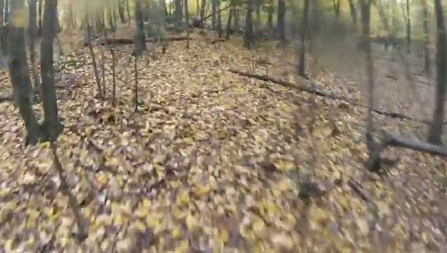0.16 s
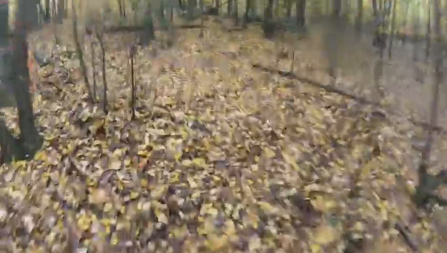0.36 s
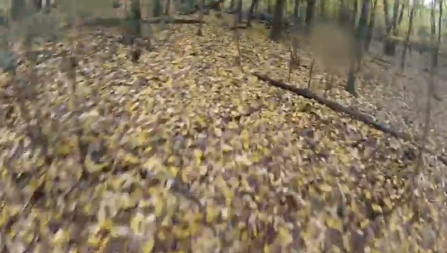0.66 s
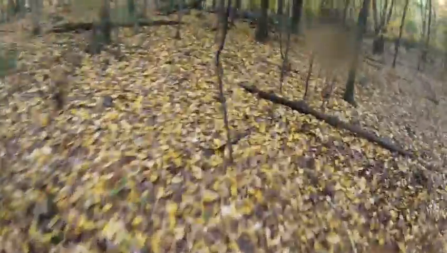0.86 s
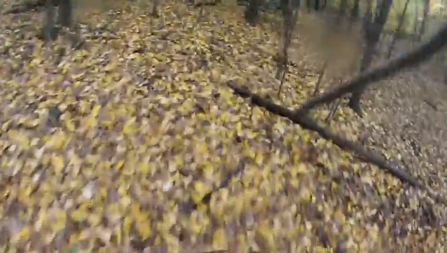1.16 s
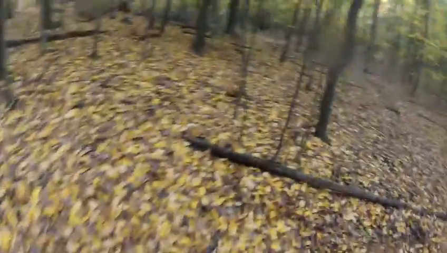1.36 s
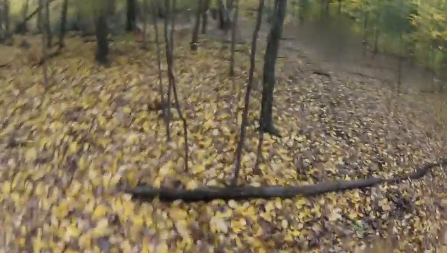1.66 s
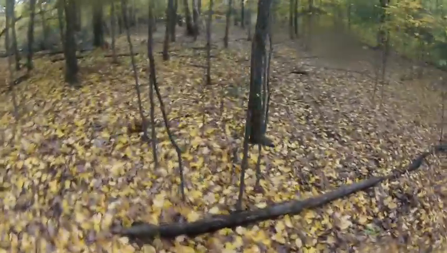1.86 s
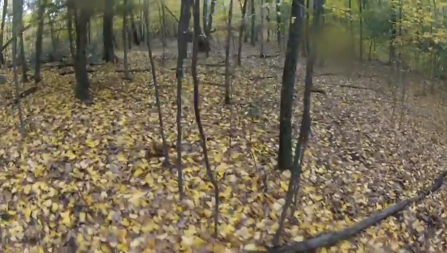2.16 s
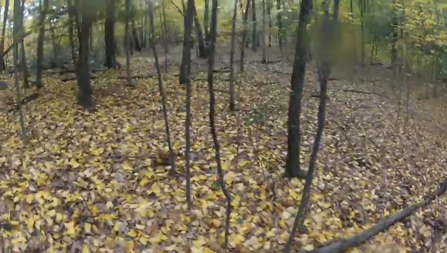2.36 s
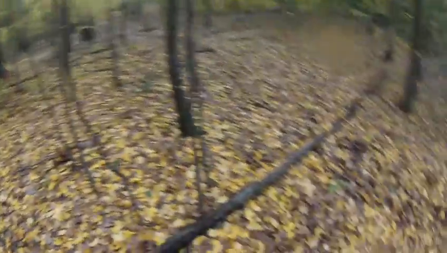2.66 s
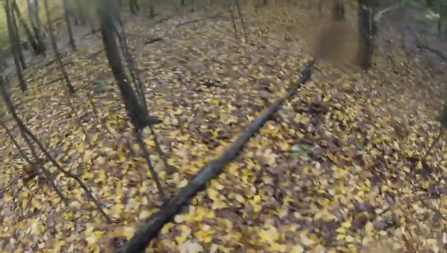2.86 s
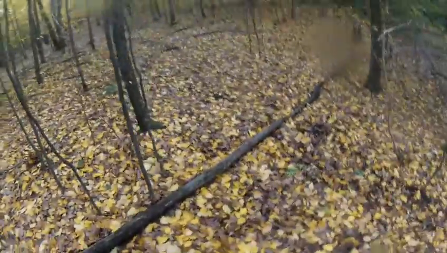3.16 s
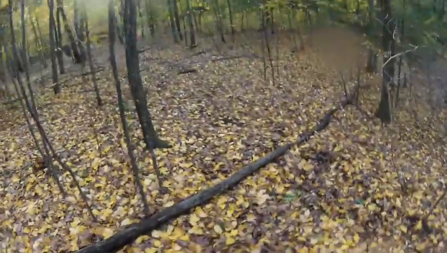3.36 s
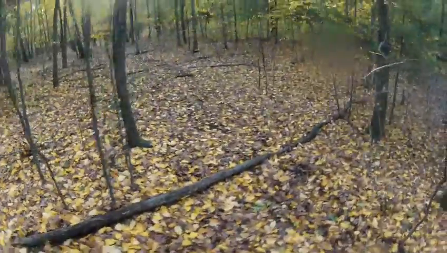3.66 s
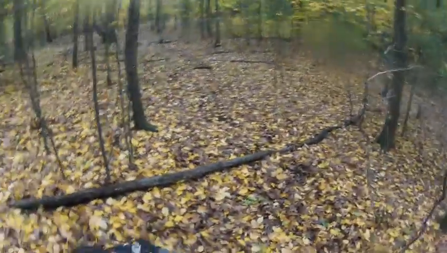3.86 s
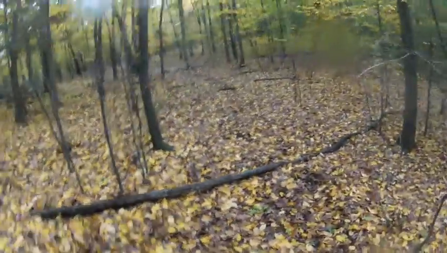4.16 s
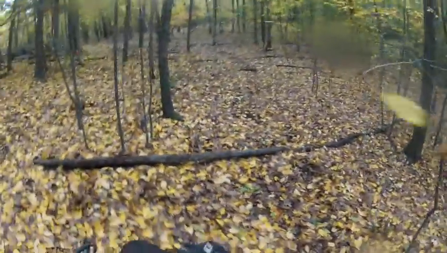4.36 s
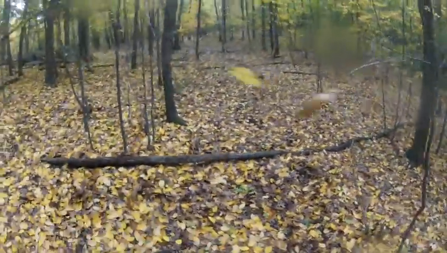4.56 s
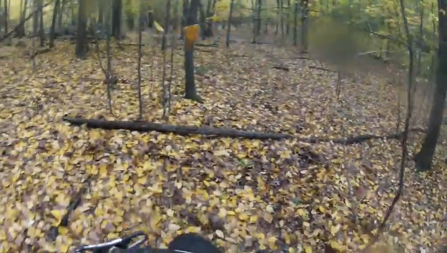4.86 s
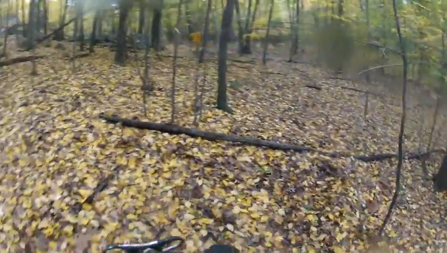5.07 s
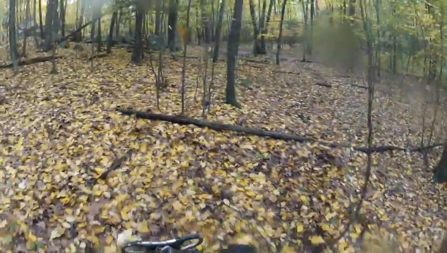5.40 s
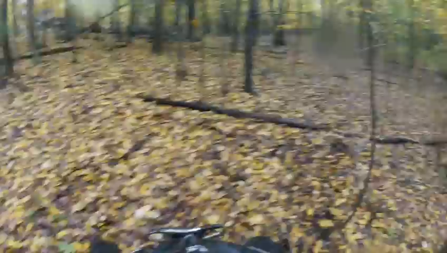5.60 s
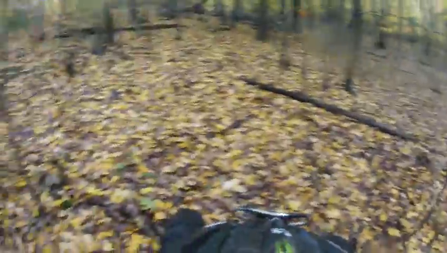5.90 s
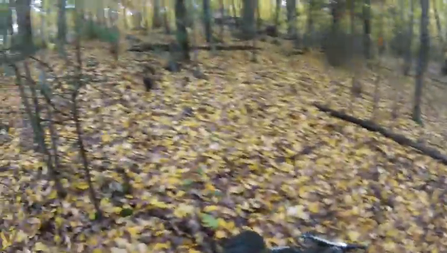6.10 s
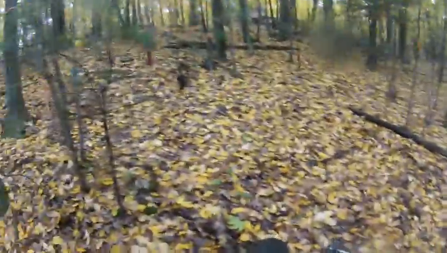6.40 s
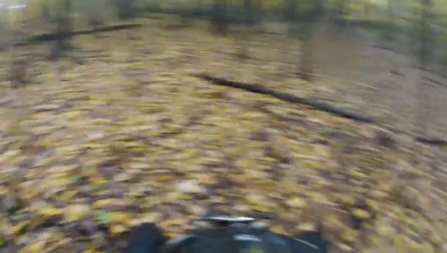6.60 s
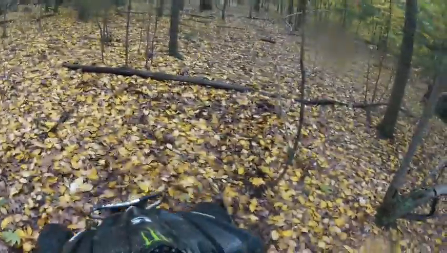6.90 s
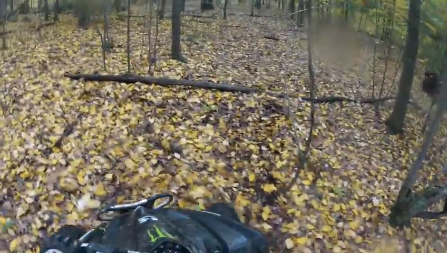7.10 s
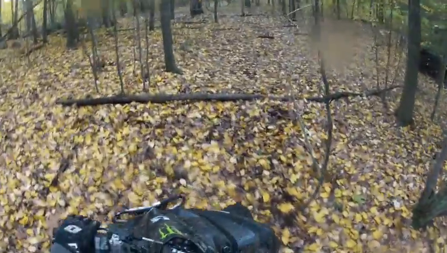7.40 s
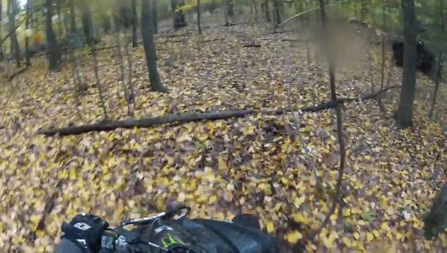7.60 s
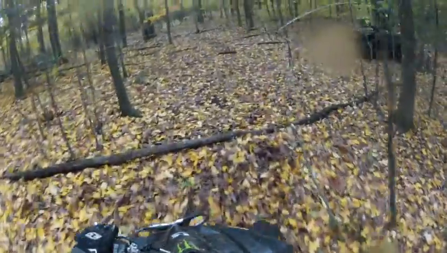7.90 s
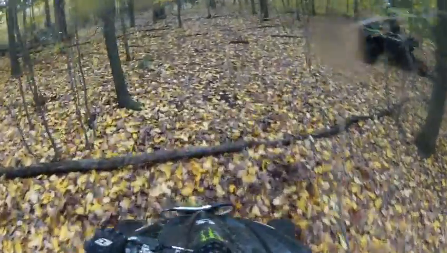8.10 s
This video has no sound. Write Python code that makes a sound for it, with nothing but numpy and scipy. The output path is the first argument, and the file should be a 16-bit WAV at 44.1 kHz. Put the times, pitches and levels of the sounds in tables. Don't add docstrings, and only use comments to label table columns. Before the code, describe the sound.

A single-cylinder quad bike putters slowly through leafy woods, rattling inside a muffled camera case, with loud twig whacks near the start.

```python
import sys
import numpy as np
from scipy import signal
from scipy.io import wavfile
from scipy.ndimage import uniform_filter1d

SR = 44100
rng = np.random.default_rng(int(sys.argv[2]) if len(sys.argv) > 2 else 0)


def voltage_ratio(decibels):
    exponent = np.asarray(decibels, float) / 20
    return 10 ** exponent


def int16_out(signal):
    q = np.round(np.clip(np.atleast_2d(signal).T, -1, 1) * 32767)
    wavfile.write(sys.argv[1], SR, q.astype(np.int16))


N = 363825
T = np.arange(N) / SR

# t/s, firing rate f/Hz
ENGINE_SPEED = [(0, 29.5), (.9, 22.3), (1.3, 22.6), (1.55, 16.6), (1.8, 14.5), (2.05, 18.95), (2.4, 18.65),
                (3.05, 19.45), (4, 19.27), (4.4, 18.43), (5.1, 18.97), (6.5, 19.1), (6.77, 31.8),
                (7.1, 16.7), (7.3, 22.6), (7.47, 23.9), (8, 24.9), (8.25, 22.5)]
# t/s, throttle as clatter level/dB, exhaust level/dB as the head turns to the pipe
RIDER = [(0, -42.5, -7.5), (.8, -45.5, -9), (1.0, -48.5, -9.5), (1.35, -45, -12.5), (1.9, -50.5, -9),
         (2.3, -50.5, -1.5), (2.8, -49.5, 0), (3.5, -48, -3.5), (4.1, -49.5, -5.5), (4.6, -47.5, -5.5),
         (4.9, -48.5, -12), (6.4, -47.5, -14), (6.75, -43, -8.5), (7.0, -46, -8), (7.2, -44.5, -9),
         (7.7, -44.5, -8), (8.05, -42, -10), (8.25, -45.5, -6)]


def engine(t):
    s, *columns = np.transpose(RIDER)
    clatter_db, facing_db = (np.interp(t, s, column) for column in columns)
    load_db = clatter_db + 49
    turns = np.cumsum(np.interp(t, *np.transpose(ENGINE_SPEED))) / SR + .15
    cycle, phase = turns.astype(int), turns % 1
    firing_luck, shake_luck = rng.standard_normal((400, 2))[cycle].T
    bang = np.diff(cycle, prepend=0) * voltage_ratio(1.3 * firing_luck)
    gas = (.55 + np.exp(-phase / .35)) * rng.standard_normal(N)
    hiss = level(band(gas, 359.2, 150), -8.5)
    crank = np.sin(4 * np.pi * turns + 1.2) * voltage_ratio(-44.5 + 2.5 * walk(7))
    machine = (hiss + clatter(phase, shake_luck)) * voltage_ratio(clatter_db)
    return exhaust(bang, gas, load_db, facing_db) + machine + crank


# f/Hz, width/Hz
CAVITIES = [(90, 62), (158, 46), (248, 135)]


def exhaust(bang, gas, load_db, facing_db):
    cavity_db = (-47 + .4 * load_db, -46 + facing_db, -49 + 1.074 * load_db)
    puff = np.convolve(bang, np.hanning(int(.003 * SR)))[:N]
    echoes = sum(gain * np.roll(puff, int(delay_s * SR))
                 for delay_s, gain in ((.0066, .35), (.0115, .3), (.0187, .3)))
    puffs = level(band(puff + echoes, 170, 300), 0) + level(band(gas, 170, 300), -6)
    pipe = 0
    for (hz, width), db, sign in zip(CAVITIES, cavity_db, (-1, 1, -1)):
        ring = band(band(puffs, hz, width), hz, width)
        pipe = pipe + sign * level(ring, 0) * voltage_ratio(db)
    pipe = signal.sosfilt(signal.butter(4, 335, fs=SR, output="sos"), pipe)
    away_db, turn_s, turn_length_s = -3.5, 1.8, .3
    return pipe * voltage_ratio(away_db * (1 - ramp(turn_s, turn_length_s)))


def clatter(phase, shake_luck):
    lug_db, lug_s, lug_length_s = 2.2, 7.0, .65
    throb_db = 1.5 + lug_db * np.sin(np.pi * ramp(lug_s, lug_length_s))
    shake = voltage_ratio(throb_db * (1.15 + .2 * shake_luck) * np.cos(2 * np.pi * (phase - .25)))
    rattle = level(rng.standard_normal(N), 0) + level(grit(.01, spread=2.0), -12)
    heard = housing(shake * voltage_ratio(0.77 * walk(6)) * rattle)
    return level(heard / np.sqrt(uniform_filter1d(shake ** 2, size=4000)), 0)


# f/Hz, width/Hz, level/dB
HOUSING_MODES = [(535, 65.5, -6), (715.4, 34.8, 0.5), (934.2, 122.8, -5), (1132, 106.7, 0.5),
                 (1792.3, 296, 0), (1992.6, 300.6, -1.5), (2340, 162.2, -0.5), (2912, 36, -17),
                 (3030, 152, -13.5), (3691.4, 241.6, -3.5), (3742.5, 149.9, -2), (4747, 1290, -22.5),
                 (5540, 250, -16)]


def housing(x):
    return sum((-1) ** k * voltage_ratio(db) * band(x, hz, width) for k, (hz, width, db) in enumerate(HOUSING_MODES))


# t/s, depth level/dB, closing/s, hold/s, opening/s
DUCKS = [
    (0.349, -18.5, .004, 0.0395, 0.0915),
    (0.501, -28.5, 0.165, .005, 0.0303),
    (1.028, -24.5, .01, 0.0896, 0.116),
]


def gain_control():
    duck_db = sum(db * (ramp(s, shut) - ramp(s + shut + hold, back)) for s, db, shut, hold, back in DUCKS)
    return voltage_ratio(2.5 + duck_db)


# t/s, peak level/dB, loudest ring f/Hz, contact/s, lens-cover ring level/dB
SWIPES = [
    [(0.353, 9.5, 2291, 0.00221, -19.5), (0.363, -27, 1660, 0.0034, -3.5), (0.371, -16, 1810, 0.00248, 0),
     (0.378, -4, 3650, 0.002, 1), (0.402, -24.5, 3030, 0.00345, -5.5)],
    [(0.482, -11.5, 3070, 0.0025, -12.5), (0.486, -15, 1736, 0.0035, -9.5), (0.498, 7, 2466, 0.0032, -7.5),
     (0.518, -21.5, 802, 0.002, -13), (0.527, -24, 1990, 0.0031, -6.5), (0.543, -9, 762, 0.0015, -6),
     (0.551, -21.5, 755, 0.0035, -8), (0.568, -1, 2045, 0.00217, -9), (0.581, -12.5, 2620, 0.0045, -15),
     (0.589, -14.5, 2100, 0.0068, -3.5), (0.603, -6.5, 1970, 0.00148, -6.5),
     (0.607, -6.5, 2050, 0.0028, -24.5), (0.626, -4, 2040, 0.00448, -4), (0.667, -15, 2045, 0.0045, -22)],
    [(1.028, 6, 919.5, 0.0035, -21.5), (1.049, 7.5, 2022, 0.0029, -16), (1.08, -19, 1510, 0.0047, -16),
     (1.09, -31, 1084, 0.00293, -21.5), (1.099, -50.5, 738, 0.0031, -8)],
]
BRUSHES = [
    [(1.244, -32.5, 1145, 0.0089, -6.5), (1.282, -34, 1045, 0.0078, -15),
     (1.538, -31.5, 1814, 0.0092, -3.5)],
    [(5.676, -27.5, 2290, 0.0042, -14), (5.679, -26, 1082, 0.00706, -18.5),
     (5.688, -22, 2340, 0.0094, -7.5), (5.69, -27.5, 1110, 0.0074, -11),
     (5.902, -28.5, 2255, 0.00505, -13.5), (5.905, -26, 1091, 0.0072, -20),
     (5.916, -30.5, 2080, 0.0067, -17.5), (5.92, -31, 1088, 0.0065, -16.5)],
]
THUD_DB = [-13.5, -25.5, -9, -11.5, -28]


def twigs():
    out, t = np.zeros(N + 4000), np.arange(4000) / SR
    hits = [(*row, thud_db) for swipe, thud_db in zip(SWIPES + BRUSHES, THUD_DB) for row in swipe]
    for s, db, hz, contact, lens_db, thud_db in hits:
        rise = contact * np.clip(-db / 45, .06, .7)
        push = rng.standard_normal(len(t)) * np.exp(-(t / contact) ** 1.71) * np.minimum(t / rise, 1)
        ring = housing(push) * np.exp(-t / 0.00662)
        ring = ring + 1.386 * band(band(push, hz, hz / 6), hz, hz / 6)
        ring = ring + 0.07 * push * np.exp(-rise / 0.0011)
        ring = ring + voltage_ratio(lens_db) * band(push, 3735, 42)
        thud = band(np.abs(push), 262, 250)
        hit = ring / np.abs(ring).max() + voltage_ratio(thud_db) * thud / np.abs(thud).max()
        start = int(s * SR)
        out[start:start + len(t)] += voltage_ratio(db) * hit
    return out[:N]


# t/s, length/s, level/dB, change by the end/dB
DRAGS = [
    (.357, 0.0226, -16.5, -25.5),
    (.48, .135, -29, 1.5),
    (0.498, 0.0214, -12.5, -11),
    (.6, 0.0149, -25, 4),
    (1.034, 0.0154, -28, 2.5),
    (1.077, 0.0248, -36, -12.5),
    (5.21, 0.165, -44, -11),
    (5.655, 0.094, -43.5, -7.5),
    (5.898, 0.076, -44.5, -8.5),
]


def dragging():
    edge_s = 0.0036
    contacts = grit(0.05, spread=3.483)
    scrape = housing(contacts) + 0.057 * contacts
    for hz, width, gain in ((2022, 220, 1.8), (3100, 900, .5), (744.6, 110, 2.14)):
        scrape = scrape + gain * band(contacts, hz, width)
    strokes = sum(voltage_ratio(db + fade_db * ramp(s, length)) * (ramp(s, edge_s) - ramp(s + length, edge_s)) ** 2
                  for s, length, db, fade_db in DRAGS)
    return level(scrape, 0) * strokes


# t/s, peak level/dB, centre f/Hz
TICKS = [(0.0972, -33, 4000), (0.185, -34.5, 5540), (0.8081, -40, 5560), (1.3857, -38.5, 5500),
         (1.4431, -49.5, 4970), (1.5153, -39.5, 4000), (1.6741, -37, 5270), (1.8427, -43.5, 5460),
         (2.0921, -43, 4777), (2.1485, -43, 4580), (2.483, -31, 5490), (3.404, -42, 4530),
         (4.1925, -33, 5650), (4.2832, -42, 4160), (5.217, -37.5, 4280), (5.3223, -34.5, 4260),
         (6.236, -44.5, 4690), (6.314, -42, 4800), (7.0484, -40, 5580), (7.108, -39, 4030),
         (7.1601, -41, 5610), (7.214, -41, 5650), (7.262, -42, 5710), (7.3065, -42, 5620),
         (7.351, -42, 4410)]


def ticks():
    out, t = np.zeros(N + 900), np.arange(900) / SR
    for s, db, hz in TICKS:
        flick = rng.standard_normal(len(t)) * np.exp(-t / 0.0068) * np.minimum(t / 0.0011, 1)
        tick = band(flick, hz, 3380)
        start = int(s * SR)
        out[start:start + len(t)] += voltage_ratio(db) * tick / np.abs(tick).max()
    return out[:N]


# peak t/s, f/Hz, level/dB, time
# to rise 20 dB/s, time to fall 20 dB/s
BOOMS = [(.1, 46.3, -45.5, 1.74, 0.8), (.48, 41.5, -33.5, 0.35, 0.18), (.9, 48, -32.5, 0.49, 0.45),
         (1.244, 40.8, -24.5, 0.3547, 0.1972), (1.52, 40, -38, .5, 0.05), (1.73, 24, -35, 0.29, 0.11),
         (2.25, 40, -40, 0.4, 0.02), (2.62, 41, -29.5, 0.2063, 0.0961), (4.02, 41, -37, 0.36, 0.14),
         (6.62, 46, -39.5, 0.4, .5), (7.03, 40, -41.5, 0.4, 0.18), (7.345, 45.03, -35, 0.37, 0.28)]


def helmet(t):
    boom = 0
    for s, hz, db, rise, fall in BOOMS:
        swell = voltage_ratio(db - 20 * np.maximum((s - t) / rise, (t - s) / fall))
        boom = boom + np.sqrt(2) * np.sin(2 * np.pi * hz * (t - s)) * swell
    wind = band(band(rng.standard_normal(N), 26, 40), 26, 40) * voltage_ratio(3 * walk(3))
    return boom + level(wind, -54.5)


def level(x, db):
    return x * voltage_ratio(db) / np.sqrt(np.mean(x ** 2))


def band(x, hz, width):
    return signal.lfilter(*signal.iirpeak(hz, hz / width, fs=SR), x)


def walk(rate):
    k = int(SR / rate)
    steps = np.repeat(rng.standard_normal(N // k + 1), k)
    return level(uniform_filter1d(uniform_filter1d(steps, k), k)[:N], 0)


def grit(share, spread):
    chance = rng.random((2, N))
    size = voltage_ratio(-spread * np.log(1 - chance[1]))
    return rng.standard_normal(N) * (chance[0] < share) * size


def ramp(start, length):
    return np.clip((T - start) / length, 0, 1)


def scene():
    machine = engine(T) * gain_control()
    return (machine + twigs() + dragging() + ticks() + helmet(T))[None]


def band_limit(x):
    return signal.sosfilt(signal.butter(12, 16270, fs=SR, output="sos"), x)


def record(dry):
    coarse = signal.resample_poly(dry, 40, 147, axis=1)
    held = np.repeat(np.clip(coarse, -1, 1), 4, axis=1)
    x = signal.resample_poly(held, 147, 160, axis=1)[:, :N]
    x = signal.sosfiltfilt(signal.ellip(8, .1, 60, 15350, fs=SR, output="sos"), x)
    mix = np.clip(x, -1, 1)
    return band_limit(mix)


dry = scene()
out = record(dry)
int16_out(out)
```